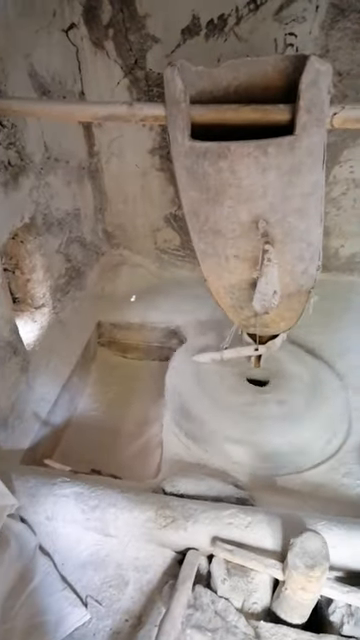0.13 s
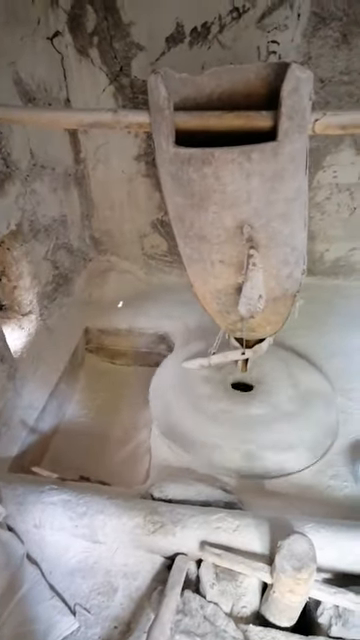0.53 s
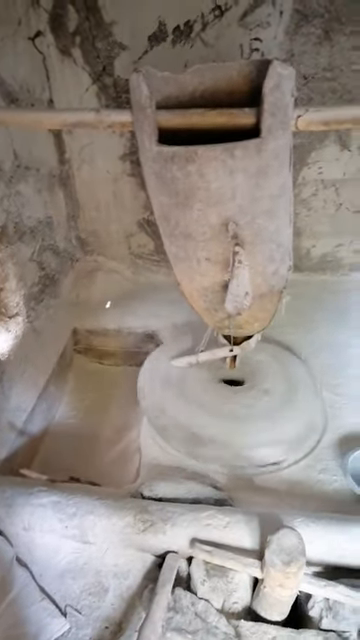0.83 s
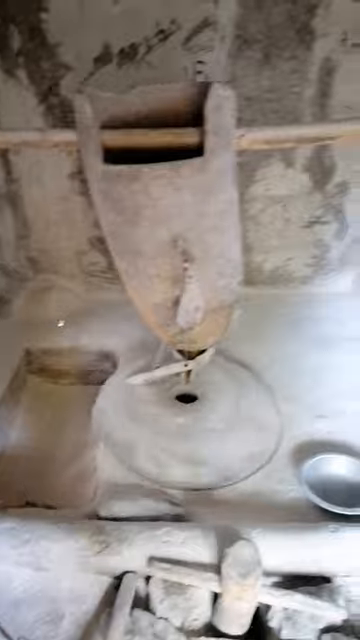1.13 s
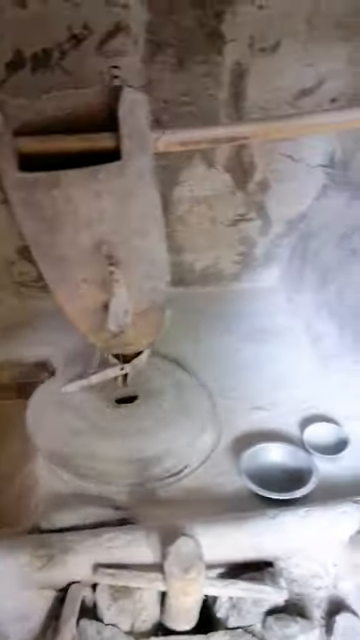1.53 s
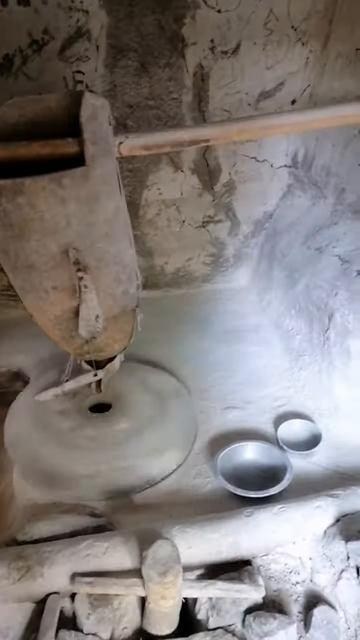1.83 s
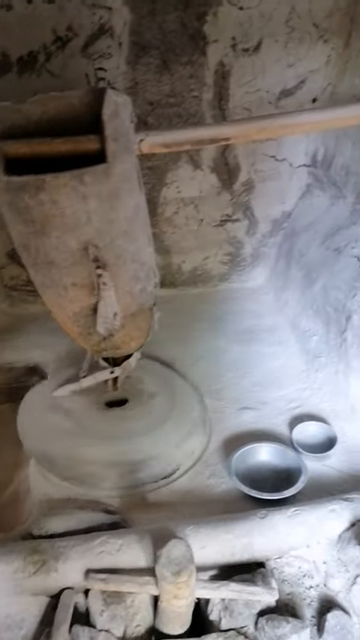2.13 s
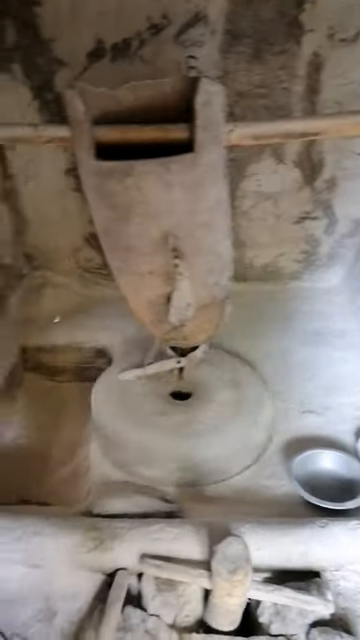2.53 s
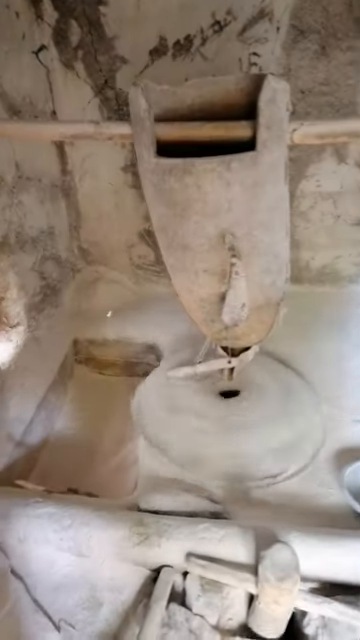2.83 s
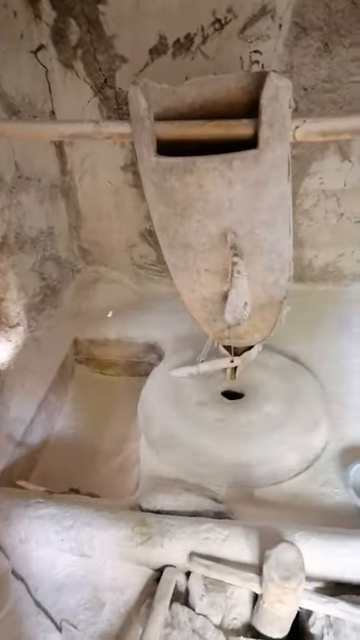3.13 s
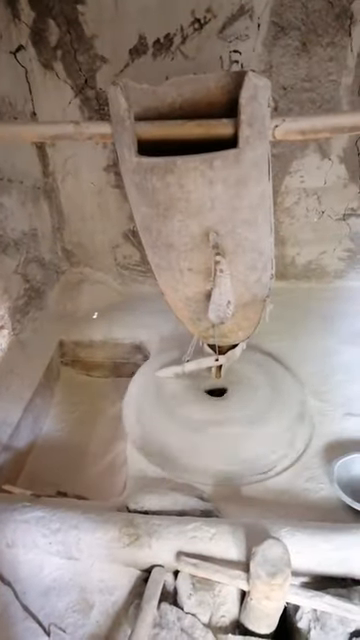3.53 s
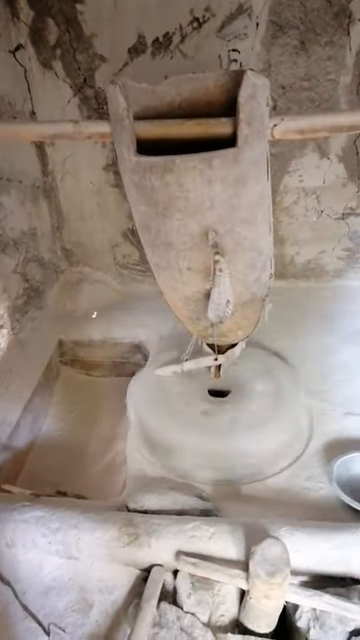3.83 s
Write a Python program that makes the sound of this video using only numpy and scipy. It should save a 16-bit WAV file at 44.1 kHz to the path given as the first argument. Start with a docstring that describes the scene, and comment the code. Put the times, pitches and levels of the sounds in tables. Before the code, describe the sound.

A millstone turns with a lumpy low rumble and gritty hiss while a wooden stick rattles on it

```python
"""A millstone turns in a small plain room, heard through two microphone ports, the right one richer in treble.
From the start, noise (the grit) drives the stone's resonances into a lumpy rumble whose colour changes
around each turn, under a broad grit hiss; a wooden stick rattles densely on the stone in random small blows.
Clear taps soon stand out, ringing the same modes as the rattle, each with a crack of noise and room echoes.
The hum surges as the stone bears down, and dips briefly between two late surges."""
import sys
import numpy as np
from scipy import signal
from scipy.fft import rfft, irfft
from scipy.io import wavfile
from scipy.ndimage import uniform_filter1d

SR = 44100
rng = np.random.default_rng(int(sys.argv[2]) if len(sys.argv) > 2 else 0)


def to_wav(s):
    """Save 16-bit WAV."""
    ch = np.atleast_2d(s).T  # columns
    pcm = np.round(np.clip(ch, -1, 1) * 32767)  # PCM
    wavfile.write(sys.argv[1], SR, pcm.astype(np.int16))


N = 175959
TURN_S, TURN_START_S = 0.636, 0.024  # period of a turn and its starting time
LOW_HZ, HIGH_HZ = 1700, 4000  # borders of the low, middle and high bands


def gain_of(db):
    """Decibel law: the amplitude ratio of a level."""
    return 10 ** (np.asarray(db) / 20)


def evened(x):
    """Normalization: unit root-mean-square amplitude."""
    return x / np.sqrt(np.mean(x ** 2) + 1e-20)


def read(points, hz):
    """Interpolation of a spectrum along a logarithmic frequency axis."""
    f, value = np.transpose(points)
    return np.interp(np.log(hz + 1), np.log(f + 1), value)


def resonate(x, hz, width):
    """Damped resonance: a pole pair whose damping sets the bandwidth."""
    r = np.exp(-np.pi * width / SR)
    return signal.lfilter([1, 0, -1], [1, -2 * r * np.cos(2 * np.pi * hz / SR), r * r], x)


def sides(db):
    """Interchannel level difference: left and right gains, half the difference each way."""
    return gain_of([db / 2, -db / 2])


def wander(per_s):
    """Random modulation: straight lines between normal random values, per_s of them a second."""
    knots = rng.standard_normal(400)
    return np.interp(np.arange(N) / SR * per_s, np.arange(len(knots)), knots)


# the stone's resonances: (frequency [Hz], width [Hz], level [dB], swing over a turn [dB],
# phase of the swing's crest [turns], left-right difference [dB])
STONE = [(33.6, 16, -48, 2, 0.15, 1.2), (263.9, 20, -53, -3, 0.074, -6), (309.2, 27, -41.5, 3, 1, -2.5),
         (343, 17, -39.5, 0.5, 0.081, -0.5), (413.6, 11.5, -45, 5, 0.44, -3),
         (502.2, 39.7, -45, 6, 0.15, -3.5), (819, 73, -53.5, 8, 0.83, 4), (982, 102, -47, 2.5, 0.92, -3.5),
         (1452, 40, -51, 5.5, 0.076, -1), (2111, 37, -53.5, 3, 0.18, -6.5),
         (3346, 110, -51.5, 2.5, 0.4, -8)]
# surges and a dip of the hum as the stone bears down: (time [s], level change [dB])
LOAD = [(0.18, 8), (0.61, 6.5), (0.78, 3.5), (0.92, 4.5), (1.05, 7), (1.27, 8), (1.56, 6.5), (1.87, 7),
        (2.06, 7), (2.47, 9), (2.78, 7), (2.95, 4.5), (3.172, 9), (3.25, -9), (3.34, 10.5), (3.55, 7.5)]
# rise and fall of the upper rumble: (time [s], level [dB])
UPPER = [(0, 5.5), (0.3, 0), (2.48, -2.5), (2.61, 6), (2.9, 1.7), (3.45, 2), (3.55, 8), (3.76, -3.5)]
# coherence of the two ports, for stone and grit: (frequency [Hz], likeness [0-1])
LIKENESS = [(60, 0.99), (150, 0.95), (430, 0.84), (520, 0.22), (800, 0), (15000, 0.09)]
LUMP_DB, LUMPS_PER_S = 3, 24  # lumps of each resonance alone
JOLT_DB, JOLTS_PER_S = 1.8, 16  # lumps shared by all resonances
SURGE_S = 0.043


def stone():
    """Forced resonance: noise excites each mode, modulated by the turn and by random lumps."""
    t = np.arange(N) / SR
    rumble, hum = np.zeros((2, N)), np.zeros((2, N))
    load = sum(db * np.exp(-((t - s) / SURGE_S) ** 2) for s, db in LOAD)
    upper = np.interp(t, *np.transpose(UPPER))
    jolts = JOLT_DB * wander(JOLTS_PER_S)
    for hz, width, db, swing_db, crest, pan_db in STONE:
        left, other = rng.standard_normal((2, N))
        same = np.clip(read(LIKENESS, hz), 0, 1)
        noise = np.array([left, same * left + np.sqrt(1 - same ** 2) * other])
        ring = resonate(resonate(noise, hz, width), hz, 2 * width)
        turn = swing_db * np.cos(2 * np.pi * ((t - TURN_START_S) / TURN_S - crest))
        level = db + turn + jolts + LUMP_DB * wander(LUMPS_PER_S)
        level = level + upper * (400 < hz < 720)
        layer = hum if 230 < hz < 400 else rumble
        layer += evened(ring) * gain_of(level) * sides(pan_db)[:, None]
    # level the hum's own fluctuation, then apply the surges
    power = (hum ** 2).mean(0)
    steady = hum * np.sqrt(power.mean() / uniform_filter1d(power, size=round(SURGE_S * SR)))
    return rumble + steady * gain_of(load)


# spectrum of the grit hiss, also colouring the crack: (frequency [Hz], relative density [dB per Hz])
GRIND = [(20, -5), (103, -22.5), (200, -7), (339, -5), (660, -9.5), (1360, -12.5), (2650, -18),
         (3900, -25.5), (4610, -19), (7810, -32.5), (13500, -40.5), (14900, -32), (15600, -44)]
# balance of the ports for hiss and crack: (frequency [Hz], left-right difference [dB])
TILT = [(60, -1.5), (110, -17), (200, 0), (380, -5.5), (700, -7), (1290, 1), (2380, -6.5), (4400, -7.5),
        (8120, -8.5), (15000, -14)]
GRIND_DB, PATCH_DB, FLICKER_DB = -36.5, 2.4, 0.57


def grind():
    """Shaped broadband noise: short-time spectra with drifting patches and a flicker shared above LOW_HZ."""
    frames, hz = N // 128 + 5, np.fft.rfftfreq(512, 1 / SR)
    a, b, c, d, patches = rng.standard_normal((frames, 257, 5)).T
    # smooth the patches over frequency and time
    patches = uniform_filter1d(patches, size=6, axis=0)
    patches = evened(uniform_filter1d(patches, size=20, axis=1))
    flicker = evened(uniform_filter1d(rng.standard_normal(frames), size=6))
    same, left = np.clip(read(LIKENESS, hz), 0, 1)[:, None], a + 1j * b
    right = same * left + np.sqrt(1 - same ** 2) * (c + 1j * d)
    spectra = np.array([left, right]) * sides(read(TILT, hz))[:, :, None]
    level = read(GRIND, hz)[:, None] + PATCH_DB * patches
    level += FLICKER_DB * flicker * (hz[:, None] > LOW_HZ)
    hiss = signal.istft(spectra * gain_of(level), nperseg=512, noverlap=384)[1][:, :N]
    return gain_of(GRIND_DB) * evened(hiss)


RATTLE_PER_S, RATTLE_DB, RATTLE_SPREAD_DB = 110, -48, 3.5


def rattle():
    """Random point process: small blows at chance times, with exponentially distributed decibel rises."""
    height = gain_of(RATTLE_SPREAD_DB * np.minimum(rng.exponential(1, N), 4))
    return height * (rng.random(N) < RATTLE_PER_S / SR)


# modes the stick rings: (frequency [Hz], relative level [dB], t60 [s], left-right difference [dB])
STICK = [(899, -15.5, 0.12, 8.5), (1357, 0, 0.06, 3), (1907, -2.5, 0.0096, 0), (2453, -15.5, 0.026, -9),
         (2639, -1.5, 0.052, -2), (2853, 16.5, 0.0054, -3), (4673, -11, 0.027, -17.5),
         (5180, -14, 0.013, -20), (5770, -7.5, 0.0063, -16), (6617, -4.5, 0.0088, -12)]
# taps: (time [s], relative level [dB], low modes [dB], middle modes [dB], high modes [dB])
TAPS = [(0.1213, -23, -12, -35, -8.5), (0.1634, -17, -17, -12.5, -5.5), (0.195, -13, -20.5, -18, -16),
        (0.2394, -21, -26, -33, -3), (0.324, -15, -32, -12.5, -23), (0.373, -17.5, -43, -8.5, -18),
        (0.532, -15.5, -27, -16, -10.5), (0.708, -33, -4.5, -20, -30), (0.8275, -29.5, -7, -44, 2.5),
        (0.9257, -17, -11.5, -15, -7), (0.971, -16, -12, -11, -8), (1.0161, -19, -11.5, -2, -11),
        (1.075, -32, -19, -2, 1), (1.172, -21.5, -37, -1, -9.5), (1.226, -33, -27, -12, -17),
        (1.4601, -22.5, -5, -37, -4), (1.524, -39, -38, -27, -4), (1.573, -30.5, -28, -9, 1),
        (1.6325, -29.5, -4, 4, -3), (1.659, -29, -9, -5, -9), (1.708, -22.5, -11, -0.5, -22),
        (1.7353, -24.5, -2, 2.5, -5), (1.812, -27.5, -15, 4, 3), (1.858, -25, -10, -1, -34),
        (1.887, -30, 7, -8, -30), (1.9928, -30, 0, -4.5, -30), (2.0306, -32, 6, -2, -2),
        (2.0988, -38, -22, -18, 3), (2.1627, -33.5, -29, -10, 3), (2.199, -19, -6.5, -4.5, -11),
        (2.2503, -22, -4.5, -2, -10), (2.2916, -19, -9, -5, -20), (2.344, -25.5, -5, 2, -55),
        (2.398, -31.5, -12, 0, -32), (2.4502, -25, -6, 2.5, -9), (2.4918, -24.5, -7, -4, -13),
        (2.624, -33, -1, -31, 2), (2.711, -35.5, 8, -28, 3), (2.8317, -28.5, -3, -13, -7),
        (2.8716, -25.5, -8, 1.5, -10), (2.921, -22, -14, -11, -13.5), (2.9944, -34, -9, -24, 6.5),
        (3.026, -20.5, -12.5, -4, -17), (3.1933, -28, -4.5, -2.5, -10), (3.4027, -27, -39, -11, -6),
        (3.505, -21.5, -8, 5.5, -2), (3.655, -31, -12, -6, -20), (3.709, -13.5, -32, -8.5, -26),
        (3.7609, -49, -9, -19, -35)]
TAP_DB, SPREAD_DB = 4.5, 1.6  # lift of all taps, random spread of each mode
CHATTER_S, CHATTER_PER_S, RISE_S = 0.0074, 1500, 0.00075  # decay, grain rate, onset
STRIKE_DB, RUN_ON_DB, RUN_ON_S = -3.5, -12.5, 0.025  # direct strike; rebounds and their decay
SOFT_CYCLES = 3.85  # time constant of a mode's onset
RIGHT_LATE_S = 0.0005


def stick(bumps):
    """Impulsive modal excitation: strikes, chatter and uneven rebounds ring damped sinusoids."""
    rows, t, out = np.array(TAPS), np.arange(SR // 4) / SR, np.zeros((2, N))
    at = (rows[:, 0] * SR).astype(int)
    chance = rng.standard_normal((len(rows), len(STICK)))
    rebound = gain_of(RUN_ON_DB) * np.exp(-t / RUN_ON_S)
    shape = (1 - np.exp(-t / RISE_S)) * np.exp(-t / CHATTER_S)
    shape /= np.sqrt(np.sum(shape ** 2) * CHATTER_PER_S / SR)
    for k, (hz, db, t60, pan_db) in enumerate(STICK):
        # the lowest mode rings with the middle ones
        group = rows[:, 2 + (hz > LOW_HZ or k == 0) + (hz > HIGH_HZ)]
        taps = np.zeros(N)
        taps[at] = gain_of(TAP_DB + rows[:, 1] + group + SPREAD_DB * chance[:, k])
        # rebounds fall at the rattle's instants
        rebounds = np.sign(bumps) * signal.oaconvolve(taps, rebound)[:N]
        blows = taps + gain_of(RATTLE_DB) * bumps + rebounds
        grains = rng.choice([-1., 1.], N) * (rng.random(N) < CHATTER_PER_S / SR)
        chatter = signal.oaconvolve(blows, shape)[:N] * grains
        drive = chatter + gain_of(STRIKE_DB) * blows
        envelope = gain_of(db - 60 * t / t60) * (1 - np.exp(-t * hz / SOFT_CYCLES))
        ring = envelope * np.sin(2 * np.pi * hz * t)
        out += sides(pan_db)[:, None] * signal.oaconvolve(drive, ring)[:N]
    out[1] = np.roll(out[1], round(RIGHT_LATE_S * SR))
    return out


CRACK_DB, CRACK_S, CRACK_HZ, CRACK_TOP_HZ = 5, 0.006, 2200, 12800  # gain, decay, band edges


def crack(bumps):
    """Transient noise radiation: each tap and rattle blow releases a decaying, band-shaped burst."""
    rows, t = np.array(TAPS), np.arange(SR // 4) / SR
    blows = gain_of(RATTLE_DB) * bumps
    blows[(rows[:, 0] * SR).astype(int)] += gain_of(rows[:, 1] + rows[:, 4] / 2)
    shape = (1 - np.exp(-t / RISE_S)) * np.exp(-t / CRACK_S)
    burst = signal.oaconvolve(blows, shape)[:N] * rng.standard_normal((2, N))
    hz = np.fft.rfftfreq(N, 1 / SR)
    colour = gain_of(read(GRIND, hz) - read(GRIND, CRACK_HZ)) * sides(read(TILT, hz))
    colour *= np.minimum(hz / CRACK_HZ, 1) / (1 + (hz / CRACK_TOP_HZ) ** 2)
    return gain_of(CRACK_DB) * irfft(rfft(burst) * colour, N)


ROOM_DB, ROOM_T60 = -5, 0.17  # echo gain, reverberation time [s]


def room(x):
    """Reverberant decay: sparse echoes of random sign; three sets take turns as the stone goes round."""
    length = SR // 3
    slots, out = np.arange(150, length - 20, 20), 0
    decay = gain_of(-60 * np.arange(length) / SR / ROOM_T60)
    for k in range(3):
        echoes = np.zeros((2, length))
        at = slots + rng.integers(0, 20, (2, len(slots)))
        np.put_along_axis(echoes, at, rng.choice([-1., 1.], (2, len(slots))), 1)
        echoes *= decay
        # the squares of the three shares always sum to one
        share = np.sqrt(2 / 3) * np.cos(2 * np.pi * (np.arange(N) / SR / TURN_S + k / 3))
        out = out + signal.fftconvolve(x * share, echoes / np.linalg.norm(echoes[0]), axes=1)[:, :N]
    return out


def scene():
    """Superposition: stone, grit and wood add, and the wood alone excites the room."""
    bumps = rattle()
    wood = stick(bumps) + crack(bumps)
    return stone() + grind() + wood + gain_of(ROOM_DB) * room(wood)


def record(dry):
    """Band limitation: a linear-phase low-pass filter at 15650 Hz."""
    lowpass = signal.firwin(511, 15650, window=("kaiser", 9), fs=SR)
    return signal.oaconvolve(dry, lowpass[None], "same")


dry = scene()
out = record(dry)
to_wav(out)
```